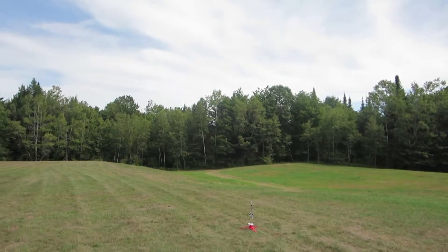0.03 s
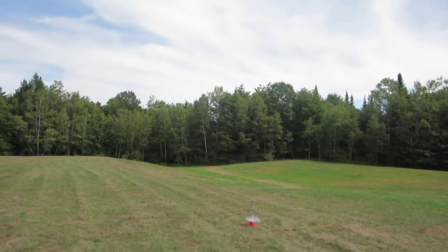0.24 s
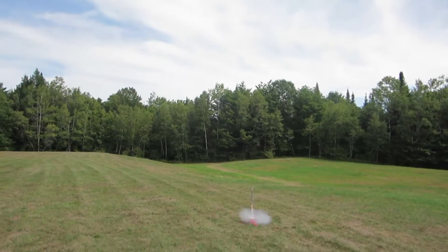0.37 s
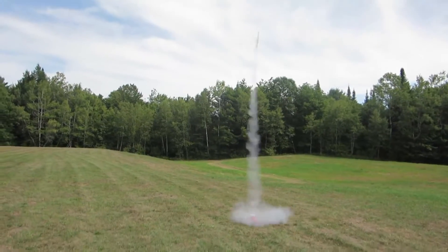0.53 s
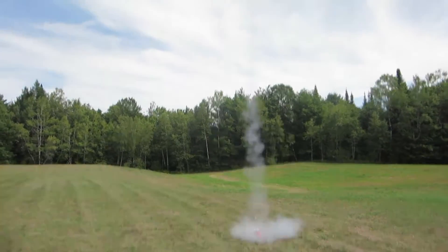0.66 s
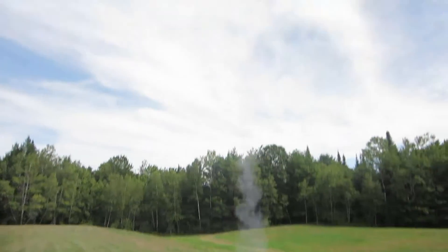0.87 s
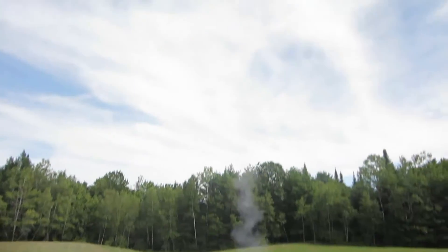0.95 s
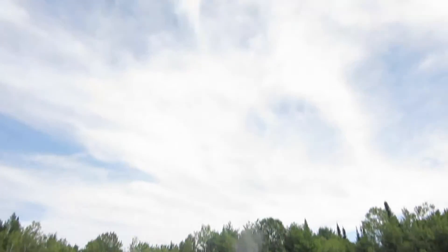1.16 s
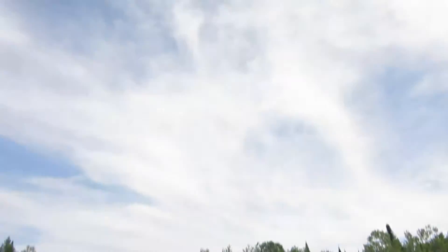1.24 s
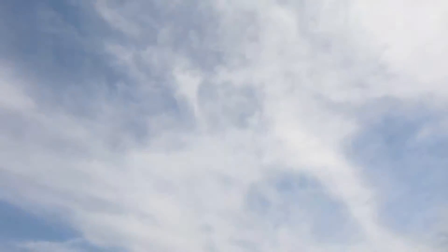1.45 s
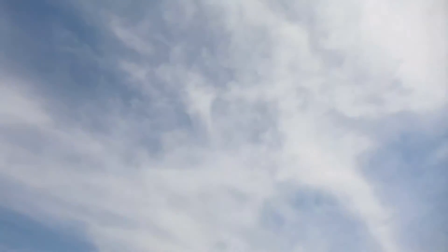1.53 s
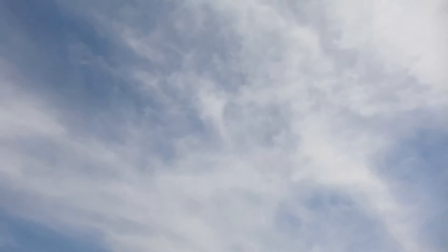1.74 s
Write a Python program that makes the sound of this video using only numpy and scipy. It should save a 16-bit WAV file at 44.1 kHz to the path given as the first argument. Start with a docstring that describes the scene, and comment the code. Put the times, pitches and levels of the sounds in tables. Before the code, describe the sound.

A model rocket blasts off with a short crackling roar, then fades overhead to faint hiss

```python
"""Model rocket lift-off

A model rocket leaves a mown field ringed by trees, a few metres from a hand-held microphone.
Its jet is shaped noise with small shocks: it blasts the pad, then roars and crackles in the open air.
As the rocket climbs, the jet's colour thins and moving hollows and a ground echo sweep through it.
The thrust drops to a weak noise hiss that fades overhead and loses treble, leaving outdoor air,
low rumble, a thin high hiss and a few handling noises made of short ringing bursts.
"""
import sys
import numpy as np
from scipy import signal
from scipy.io import wavfile

SR = 44100
rng = np.random.default_rng(int(sys.argv[2]) if len(sys.argv) > 2 else 0)


def digitize_waveform(pressure):
    """Quantize a signal to 16-bit integers and store it at the path in sys.argv[1].

    Rows of a 2-D input are taken as channels; values are limited to [-1, 1].
    """
    field = np.atleast_2d(pressure).T
    bounded = np.clip(field, -1, 1)
    quanta = np.round(bounded * 32767).astype(np.int16)
    wavfile.write(sys.argv[1], SR, quanta)


N = 79380
T = np.arange(N) / SR  # time of every sample, s
BOOST_END_S = 0.773
CRACK_HZ, CRACK_Q = 1950, 0.81  # ring of both the dense crackle and the single cracks


def from_db(db):
    """Turn decibels into a gain."""
    return 10 ** (np.asarray(db) / 20)


def rms_one(x):
    """Scale a sound to unit power."""
    return x / np.sqrt(np.mean(x ** 2) + 1e-20)


def in_time(rows, axis=1):
    """Read one column of a time table at every sample, with straight lines between rows."""
    rows = np.array(rows)
    return np.interp(T, rows[:, 0], rows[:, axis])


def at_hz(points, hz, axis=1):
    """Read one column of a pitch table, with straight lines on a log-frequency axis."""
    points = np.array(points)
    return np.interp(np.log(hz), np.log(points[:, 0]), points[:, axis])


def drift(rate_hz):
    """Random wandering with spread 1: noise smoothed by two equal low-pass poles."""
    step = 20  # samples between the slow values
    pole = np.exp(-2 * np.pi * step * rate_hz / SR)
    noise = rng.standard_normal(N // step + 2002)
    slow = signal.lfilter([1], [1, -2 * pole, pole * pole], noise)[2000:]  # skip the filter's start
    return np.interp(np.arange(N) / step, np.arange(len(slow)), rms_one(slow))


def resonance(x, hz, q):
    """Ring at one pitch: a two-pole band-pass, sharper for a higher q."""
    return signal.lfilter(*signal.iirpeak(min(hz, SR / 2 - 1), q, fs=SR), x + 1e-18)


def moving_bell(x, hz, db, q, size=128):
    """Boost or cut one band of a stereo sound, moving its centre and height block by block."""
    out = np.zeros_like(x)
    state = np.zeros((2, 2))  # carried from block to block
    db = db + np.zeros(N)
    for i in range(0, N, size):
        block = slice(i, i + size)
        w, g = 2 * np.pi * hz[i] / SR, from_db(db[i] / 2)
        k, c = np.sin(w) / (2 * q), -2 * np.cos(w)
        top, bottom = [1 + k * g, c, 1 - k * g], [1 + k / g, c, 1 - k / g]
        out[:, block], state = signal.lfilter(top, bottom, x[:, block], zi=state)
    return out


def turbulence(colour_db, stereo, patchy_db, wider_db=0):
    """Stereo noise in narrow bands, each wandering in level; the shared middle has about unit power."""
    # wider bands at the bottom, quarter octaves from 400 Hz up
    edges = np.r_[22, 44, 70, 100, 140, 200, 280, 400 * 2 ** (np.arange(21) / 4)]
    centred_below_hz = 1900  # no left-right level difference below this
    white = rng.standard_normal((2, 2, N))  # neighbouring bands use different noise
    sign = np.array([[1], [-1]])  # left, right
    out, power = 0, 0
    for k, (low, high) in enumerate(zip(edges, edges[1:])):
        band = signal.butter(4, [low, high], "band", fs=SR, output="sos")
        mid, side = signal.sosfilt(band, white[k % 2])
        hz = np.sqrt(low * high)
        gain = from_db(colour_db(hz)) * np.sqrt(high - low)  # level per Hz to level per band
        side_gain = from_db(at_hz(stereo, hz) + wider_db)
        pair = rms_one(mid) + side_gain * rms_one(side) * sign
        left_minus_right_db = at_hz(stereo, hz, axis=2) * (hz > centred_below_hz)
        pair = pair * from_db(sign * left_minus_right_db / 2)
        out = out + gain * from_db(patchy_db * drift(23.2)) * pair
        power = power + gain ** 2
    return out / np.sqrt(power)


def outdoor_air():
    """Broad outdoor noise that sinks away through the blast and then returns."""
    # colour of the air: pitch_hz [Hz], relative_level_db [dB per Hz]
    air_colour = [(40, -39), (130, -10), (300, 1), (700, -2), (1100, 3), (1400, 1), (2100, -12.5),
                  (3000, -9.5), (3700, -13.5), (5400, -11), (6500, -27), (9000, -27), (10500, -54)]
    # loudness of the air: time_s [s], level_db [dB]
    air_level = [(0, -53), (.15, -53), (.6, -85.5), (1.2, -59), (1.6, -59), (1.8, -59)]
    # spread over the channels: pitch_hz [Hz], side_against_mid_db [dB], left_minus_right_db [dB]
    air_stereo = [(100, -7, 0), (400, -6.5, 0), (1500, -11.5, 0.8), (2500, 0.5, 2), (4970, 0, 2)]
    air = turbulence(lambda hz: at_hz(air_colour, hz), air_stereo, patchy_db=0.65)
    return from_db(in_time(air_level)) * air


def rumble():
    """Low, patchy noise on the microphone."""
    # colour of the rumble: pitch_hz [Hz], relative_level_db [dB per Hz]
    rumble_colour = [(25, -3), (50, 4), (80, 9), (120, 3.5), (200, -2.5), (400, -55.5)]
    # loudness of the rumble: time_s [s], level_db [dB]
    rumble_level = [(0, -56), (.26, -51), (.3, -73), (.48, -81.5), (.55, -98), (.75, -84), (.87, -71),
                    (1.5, -66), (1.66, -61.5), (1.8, -63.5)]
    # spread over the channels: pitch_hz [Hz], side_against_mid_db [dB], left_minus_right_db [dB]
    rumble_stereo = [(40, -31, 0), (150, -21.5, 1)]
    low_noise = turbulence(lambda hz: at_hz(rumble_colour, hz), rumble_stereo, patchy_db=3.0)
    return from_db(in_time(rumble_level)) * low_noise


def high_hiss():
    """A thin band of high noise, separate in each channel."""
    # loudness of the hiss: time_s [s], level_db [dB]
    hiss_level = [(.15, -55), (.5, -72), (1.8, -64)]
    band = signal.butter(5, (7680, 9110), "band", fs=SR, output="sos")  # Hz
    hiss = signal.sosfilt(band, rng.standard_normal((2, N)))
    return from_db(in_time(hiss_level)) * rms_one(hiss)


def background():
    """Add up the outdoor air, low rumble and thin high hiss."""
    return outdoor_air() + rumble() + high_hiss()


def handling():
    """Short ticks and a soft bump as the hand tilts upward: fading noise bursts through a resonance."""
    # start_s [s], peak_db [dB, before the final low-pass], pitch_hz [Hz], decay_s [s to fall 60 dB]
    bumps = [(1.4592, -40, 5600, 0.008), (1.459, -41, 2500, .014), (1.574, -47, 1100, .03),
             (1.658, -46.5, 80, 0.045)]
    out = 0
    for start_s, peak_db, hz, decay_s in bumps:
        fade = (T >= start_s) * from_db(-60 * np.abs(T - start_s) / decay_s)
        burst = resonance(rng.standard_normal(N) * fade, hz, q=1.44)
        out = out + from_db(peak_db) * burst / np.abs(burst).max()
    return signal.sosfilt(signal.butter(8, 7400, fs=SR, output="sos"), out)  # low-pass, Hz


def sustain():
    """The weak burn, with its scatter from the trees, recedes and the air takes more of its treble."""
    # loudness of the weak burn: time_s [s], level_db [dB]
    sustain_level = [(.4, -94), (.72, -46), (.8, -45.5), (.92, -48.5), (1.02, -49), (1.13, -50),
                     (1.27, -56.5), (1.55, -56), (1.8, -60)]
    # its colour before air loss: pitch_hz [Hz], relative_level_db [dB per Hz]
    sustain_colour = [(90, -45), (160, -18), (330, -14.5), (600, -9), (1000, -5.5), (2000, -1), (3000, -3),
                      (5000, -9.5), (7000, -12), (9000, -21.5), (10500, -27), (12400, -30.5)]
    # spread over the channels: pitch_hz [Hz], side_against_mid_db [dB], left_minus_right_db [dB]
    sustain_stereo = [(700, -53, 0), (1400, -30, -3.5), (2300, -4, 6), (4000, -3, 3), (8000, 1, 1.5)]
    air_loss_db_per_khz_s = 7
    receding_s = np.maximum(T - BOOST_END_S, 0)

    def colour_db(hz):
        """The higher the pitch and the later the time, the more is lost in the air."""
        return at_hz(sustain_colour, hz) - air_loss_db_per_khz_s * hz / 1000 * receding_s

    return from_db(in_time(sustain_level)) * turbulence(colour_db, sustain_stereo, patchy_db=1.1)


def cracks():
    """The igniter's snap and the few shocks that stand out of the roar: clicks that ring briefly."""
    # start_s [s], click_db [dB, the strongest click setting the final peak]
    crack_list = [(0.1515, -26), (.3493, -10), (.3722, -9.5), (0.4056, -1.5), (0.4352, -10), (0.468, -22),
                  (.492, -8.5)]
    clicks = np.zeros(N)
    for start_s, click_db in crack_list:
        clicks[int(start_s * SR)] = from_db(click_db)
    ringing = resonance(clicks, CRACK_HZ, CRACK_Q)
    shocks = signal.sosfilt(signal.butter(4, 6000, fs=SR, output="sos"), ringing)  # low-pass, Hz
    return shocks * clicks.max() / np.abs(shocks).max()


def aloft():
    """Move smoothly from 0 while the jet strikes the pad to 1 in free flight."""
    liftoff_s, spread_s = 0.55, 0.056
    return .5 + .5 * np.tanh((T - liftoff_s) / spread_s)


def jet_colour(hz):
    """The pad's deep blast gives way to the thinner sound of the free jet."""
    # jet striking the pad: pitch_hz [Hz], relative_level_db [dB per Hz]
    on_pad = [(60, -82), (110, -22), (230, -12.5), (420, -8), (620, -12), (780, -6.5), (1300, -6.5),
              (2230, -4.5), (4000, -6), (5600, -6), (8200, -14), (10100, -13.5), (11600, -12), (12400, -19)]
    # free jet in the climb: pitch_hz [Hz], relative_level_db [dB per Hz]
    in_climb = [(100, -63), (170, -32), (240, -18.5), (500, -15), (780, -9), (1040, -19.5), (1300, -6),
                (2900, 1.5), (4250, -4.5), (6700, -3), (8700, -19), (12400, -16)]
    # treble against the rest of the jet: time_s [s], boost_db [dB]
    treble_level = [(.15, -2.5), (.25, -1.4), (.39, 2.6), (.46, 2.3), (.51, 4), (.62, 11), (.67, -0.5),
                    (.73, -17)]
    treble_share = .5 + .5 * np.tanh(2 * np.log(hz / 2300))  # half way in at 2300 Hz
    pad_db, climb_db = at_hz(on_pad, hz), at_hz(in_climb, hz)
    return pad_db + aloft() * (climb_db - pad_db) + treble_share * in_time(treble_level)


def crackle():
    """Dense small shocks at random times and of uneven size, ringing twice; unit power."""
    shocks_per_s, spread_db = 800, 4
    sizes = from_db(spread_db * np.minimum(rng.exponential(1, N), 4))
    clicks = sizes * (rng.random(N) < shocks_per_s / SR)
    return rms_one(resonance(resonance(clicks, CRACK_HZ, CRACK_Q), 2670, 0.9))


def surges(jet):
    """The burn is uneven: each short surge lifts a broad band in the middle of the roar."""
    # centre_s [s], half_length_s [s], boost_db [dB]
    surge_list = [(.3, 0.014, 3.5), (.333, 0.006, 4.5), (0.401, 0.003, 4.5), (0.44, 0.0091, 4),
                  (0.466, 0.01, 7.5), (0.532, .006, 2), (0.624, 0.0086, 1)]
    boost_db = sum(db * np.exp(-((T - s) / half_s) ** 2) for s, half_s, db in surge_list)
    return moving_bell(jet, np.full(N, 2050), boost_db, q=0.6)  # centre in Hz


def plume_resonance(jet):
    """The plume rings most strongly in one band, whose pitch falls overall as the rocket climbs."""
    # time_s [s], pitch_hz [Hz], boost_db [dB]
    roar = [(.16, 2180, 5.5), (.3, 2180, 6), (.39, 1713, 7.5), (.44, 1470, 7), (.49, 1480, 3),
            (.56, 1440, 6), (.72, 784, 4.5)]
    return moving_bell(jet, in_time(roar), in_time(roar, axis=2), q=4.4)


def hollows(jet):
    """Two narrow hollows edge upward, then slide down as the rocket rises over the microphone."""
    # time_s [s], lower_hz [Hz], upper_hz [Hz]
    hollow_path = [(.18, 4200, 9900), (.32, 4500, 9900), (.46, 5130, 10320), (.57, 4480, 8740),
                   (.64, 3760, 7960), (.72, 3360, 7650)]
    jet = moving_bell(jet, in_time(hollow_path), db=-8, q=15)
    return moving_bell(jet, in_time(hollow_path, axis=2), db=-13, q=15)


def grass_dip(jet):
    """Soft ground cancels one band while the jet is low; later that band is lifted a little."""
    # time_s [s], pitch_hz [Hz], change_db [dB]
    dip = [(.16, 640, -16), (.25, 640, -0.5), (.35, 630, -27), (.41, 611, -9.5), (.44, 626, 2.5)]
    return moving_bell(jet, in_time(dip), in_time(dip, axis=2), q=6)


def ground_echo(x):
    """The grass returns a copy that lags more as the rocket speeds upward, so a comb sweeps the roar."""
    pad_lag_s, leaves_pad_s, lag_s_per_s2, echo_gain = 0.000722, .33, .06, 0.09
    lag = pad_lag_s + lag_s_per_s2 * np.maximum(T - leaves_pad_s, 0) ** 2
    echo = np.array([np.interp(T - lag, T, channel) for channel in x])
    return x + echo_gain * echo


def boost():
    """The full-thrust jet: fluttering turbulence and crackle, coloured by the rocket's climb."""
    # loudness of the boost before the trim below: time_s [s], level_db [dB]
    boost_level = [(.132, -47), (.155, -35.5), (.18, -29.5), (.21, -24.5), (.27, -20), (.295, -16),
                   (.335, -15.5), (.385, -14), (.42, -17.5), (.471, -18), (.48, -20), (.51, -20.5),
                   (.56, -21), (.648, -18.5), (.68, -22.5), (.712, -30), (.745, -41.5), (.79, -48)]
    # spread before widening: pitch_hz [Hz], side_against_mid_db [dB], left_minus_right_db [dB]
    jet_stereo = [(1450, -75.5, -11), (1940, -31, -1.5), (2320, -12.5, 7.5), (2900, -7.5, 1.5),
                  (4160, -16.5, 0), (5600, -6.5, 4), (7000, -0.5, 5), (8250, 2, 4), (9820, 7.5, -3.5),
                  (11500, -10.5, -5)]
    trim_db, ignition_s, cut_db_per_s = -1.45, 0.16, 204
    flutter_db, flutter_hz, crackle_db = 1.0, 125, -9.5
    # steep fade before ignition and after the end of the boost
    outside_s = np.maximum(ignition_s - T, 0) + np.maximum(T - BOOST_END_S, 0)
    level_db = trim_db + in_time(boost_level) - cut_db_per_s * outside_s
    level_db = level_db + flutter_db * drift(flutter_hz)
    wider_db = 5 * (aloft() - .5)  # 5 dB wider aloft than on the pad
    rush = turbulence(jet_colour, jet_stereo, 1.45, wider_db)
    jet = from_db(level_db) * (rush + from_db(crackle_db) * crackle())
    jet = signal.sosfilt(signal.butter(4, 130, "high", fs=SR, output="sos"), jet)  # Hz
    jet = hollows(plume_resonance(surges(jet)))
    return ground_echo(grass_dip(jet))


def scene():
    """The launch over the open field."""
    return background() + handling() + sustain() + cracks() + boost()


def record(dry):
    """Clip the peaks just under full scale, then cut the top above 12600 Hz."""
    top_cut = signal.ellip(12, .1, 90, 12600, fs=SR, output="sos")
    return signal.sosfilt(top_cut, np.clip(dry, -.92, .92))


dry = scene()
out = record(dry)
digitize_waveform(out)
```